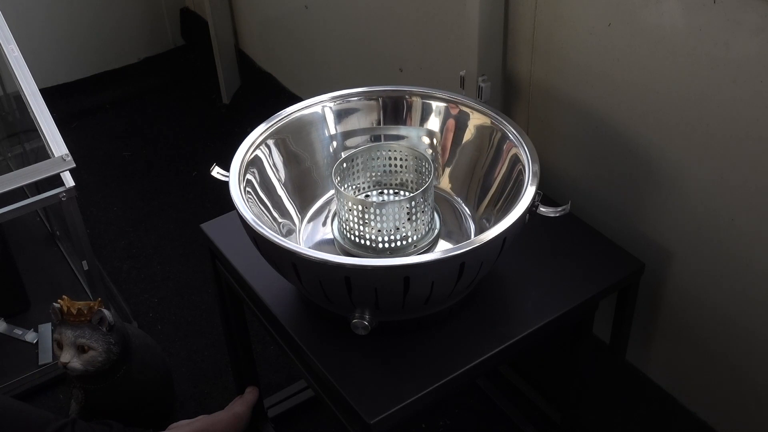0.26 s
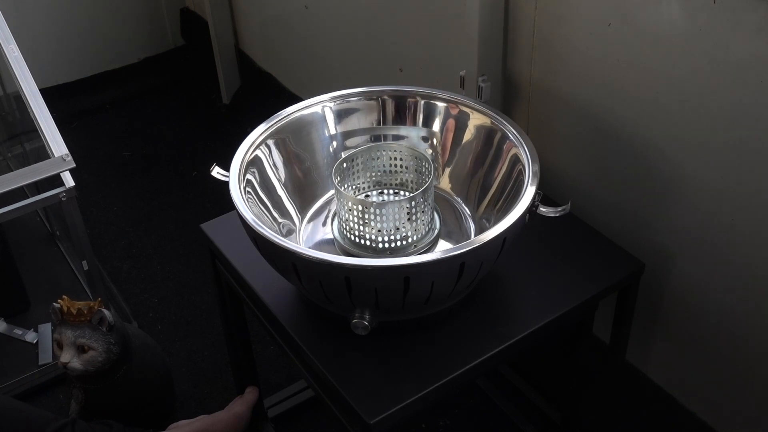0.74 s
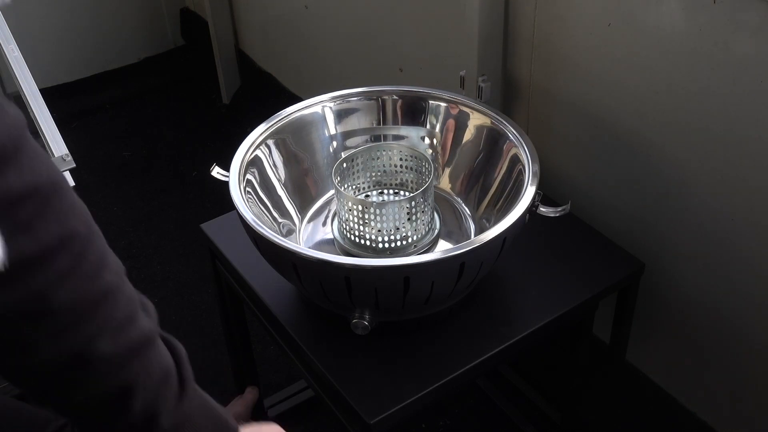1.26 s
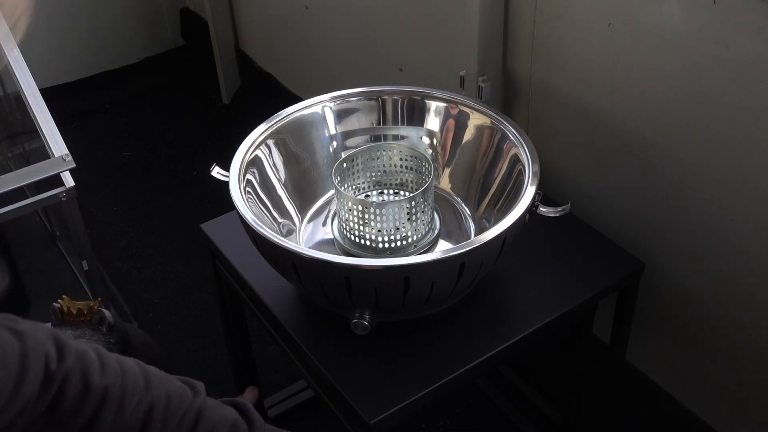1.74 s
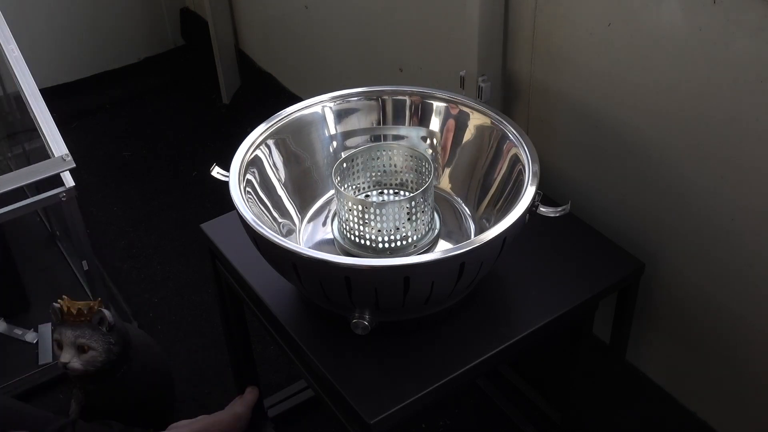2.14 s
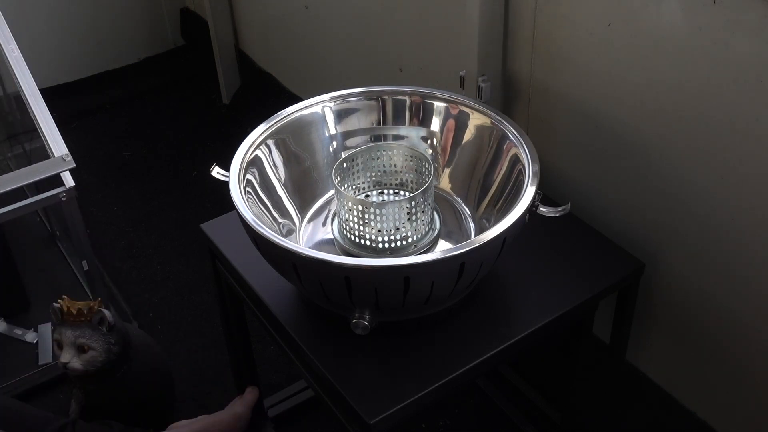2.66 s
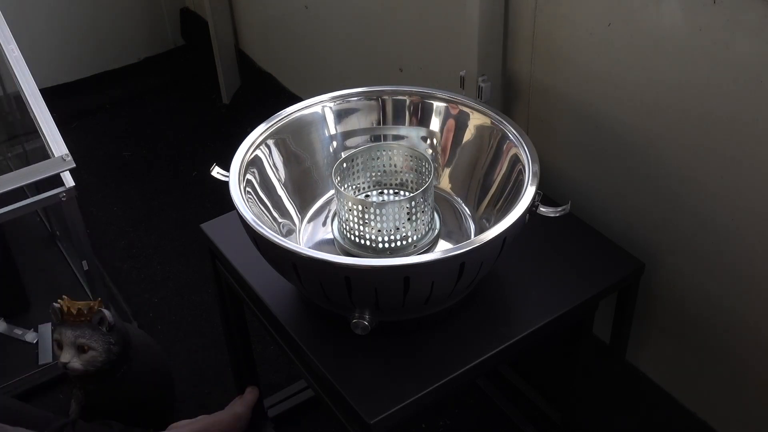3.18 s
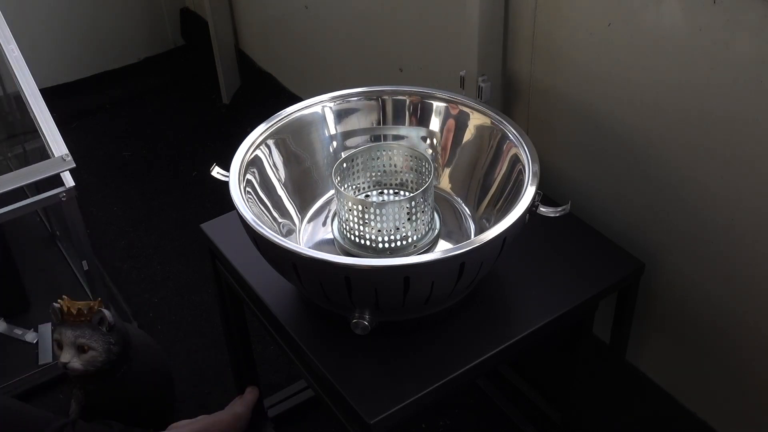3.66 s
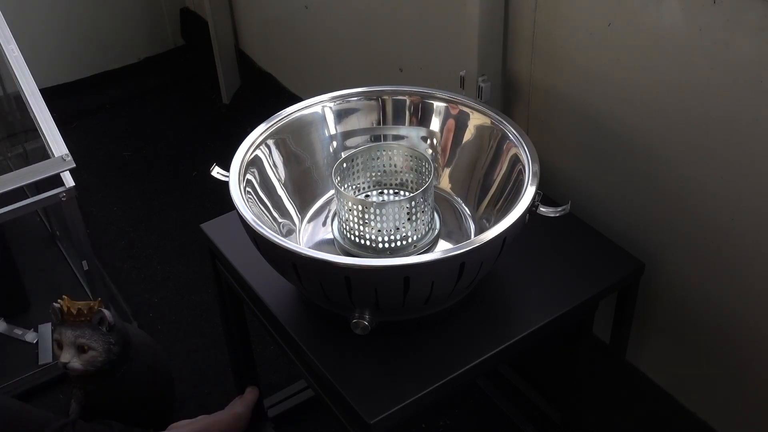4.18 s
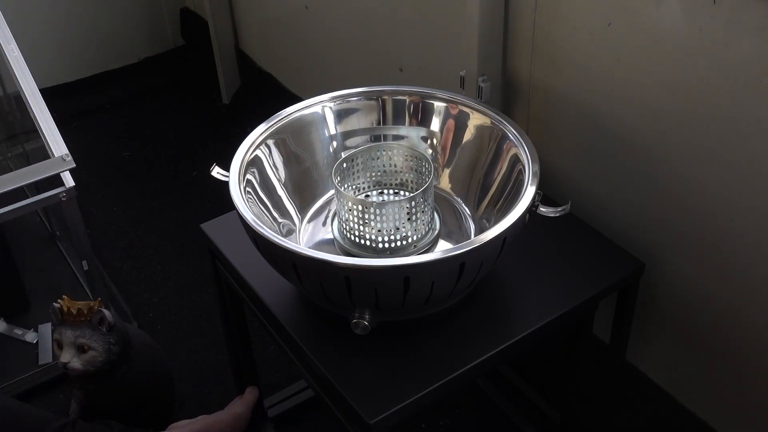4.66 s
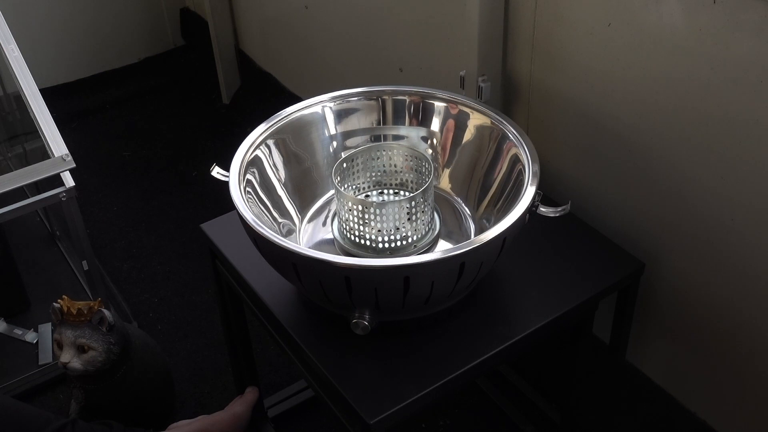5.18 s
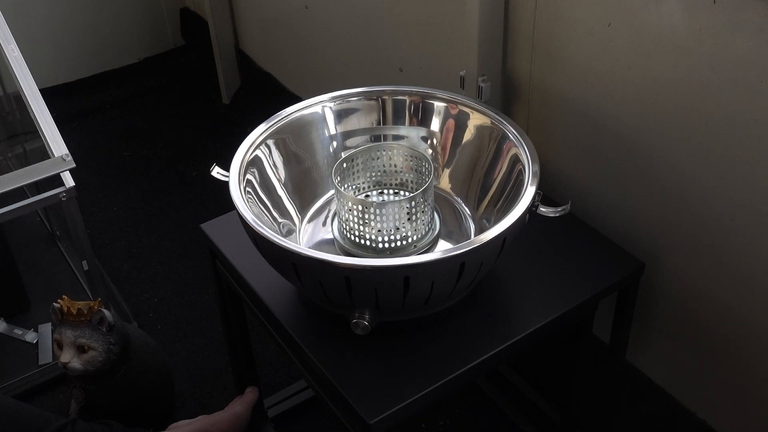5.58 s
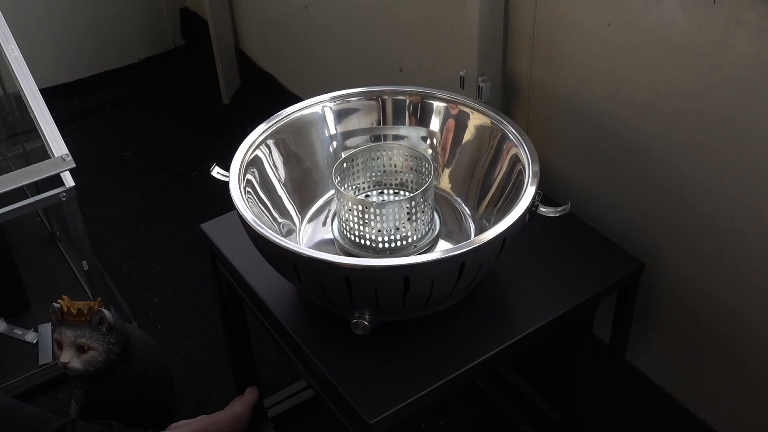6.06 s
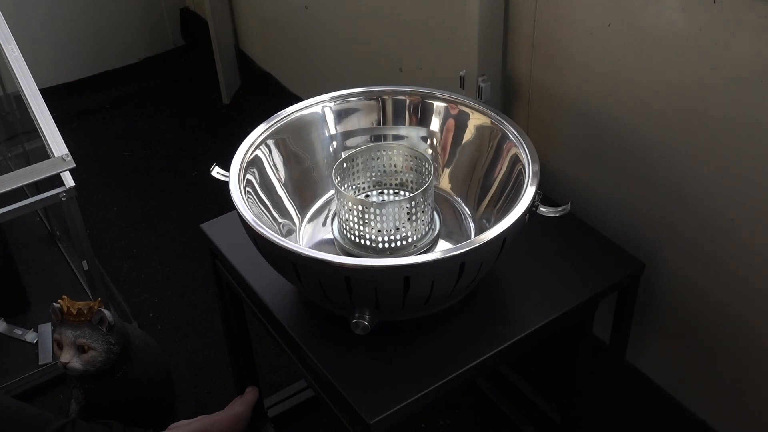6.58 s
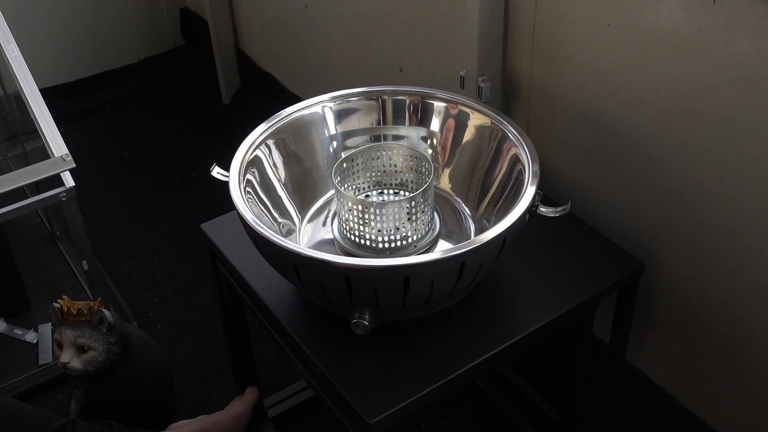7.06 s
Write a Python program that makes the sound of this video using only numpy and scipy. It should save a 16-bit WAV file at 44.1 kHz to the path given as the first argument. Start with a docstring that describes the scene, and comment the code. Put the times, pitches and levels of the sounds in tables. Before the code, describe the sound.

On a small balcony, close to the microphone, a stiff charcoal bag is barely touched at first. A short run of thin dry cracks follows, then cloth brushes and the bag starts snapping. Digging grows into loud, bright crinkling surges with grinding lumps and soft heavy thuds, ending with two crisp cracks. A low rumble and hum continue underneath, with deep puffs of air.

```python
"""A stiff bag of charcoal is rummaged through on a small balcony: many tiny noise bursts make the
crinkle and the grinding lumps, and single larger breaks make the snapping creases.
Early on comes a short run of dry cracks, with two more near the end; in between an arm digs in and
the bag crinkles in surges, over decaying low noise for thuds and soft, deep puffs of air.
Behind it go a low rumble of shaped noise and a hum of sine waves."""
import sys
import numpy as np
from scipy import signal
from scipy.io import wavfile
from scipy.ndimage import uniform_filter1d

SR = 44100
rng = np.random.default_rng(int(sys.argv[2]) if len(sys.argv) > 2 else 0)


def wav_record(signal):
    """Record a signal, one row per channel, as 16-bit PCM in the file named by sys.argv[1]."""
    frames = np.transpose(np.atleast_2d(signal))
    bounded = np.clip(frames, -1, 1)
    # unit amplitude maps onto the largest positive 16-bit level
    quanta = np.round(bounded * 32767).astype(np.int16)
    wavfile.write(sys.argv[1], SR, quanta)


N = 322812
TIME = np.arange(N) / SR   # s

# colour of the crinkling bag: pitch_hz [Hz], level_db [dB per Hz, relative]
PAPER_COLOUR = [(700, -15), (950, -19.5), (1300, -2.5), (1800, -8), (2700, -2.5), (3800, 0.5), (4800, -2.5),
                (7100, 4.5), (9700, -1), (12000, -3.5), (15500, -8)]
# colour of the lumps and of the bag's body: pitch_hz [Hz], level_db [dB per Hz, relative]
LUMP_COLOUR = [(60, 8.5), (100, 13), (150, 3.5), (200, 0.5), (250, -5), (400, -6.5), (520, 0), (650, -11),
               (760, -27), (950, -5.5), (1300, -1.5), (2200, -5.5), (4000, -12)]


def digging():
    """Each shove crumples the bag and stirs the lumps, on top of the light handling.
    Gives the crinkle's level and brightness and the lumps' level."""
    # light, unbroken handling of the bag: start_s [s], crinkle_db [dB, before the mix]
    handling = [(0.0, -40), (0.13, -59.5), (0.7, -81), (1.5, -63), (1.65, -47.5), (2.2, -52.5),
                (2.62, -47.5), (2.97, -42), (3.09, -53), (3.27, -38.5), (3.65, -38), (4.25, -48),
                (4.7, -43), (5.07, -43), (5.68, -31.5), (5.93, -51), (6.42, -45), (6.78, -52.5)]
    # shoves of the arm into the bag: full_force_s [s], crinkle_db [dB, before the mix],
    # lumps_db [dB against the crinkle, before the mix], bright_db [dB per octave],
    # attack_s [s], hold_s [s], release_s [s]
    shoves = [(2.355, -39.5, -0.5, 3.5, 0.15, .005, 0.043), (2.575, -40, 4.5, 3, .035, 0.0046, 0.0236),
              (2.678, -14, -8.5, 2.5, 0.012, 0.0043, 0.022), (2.7, -27, -7, -0.5, 0.035, 0.0115, 0.22),
              (2.817, -8.5, -8.5, 1, 0.012, 0.0078, .036), (2.851, -18, -8.5, -0.5, 0.018, 0.0078, .03),
              (3.15, -35, -4.5, -5, 0.0091, 0.00334, 0.018), (3.215, -29, -5.5, 2.5, 0.008, 0.0039, 0.023),
              (3.321, -23, -7, 0, 0.062, 0.032, 0.041), (3.435, -12.5, -12, -3, 0.027, 0.022, .1),
              (3.836, -26, -7, -0.5, 0.14, 0.057, 0.186), (4.075, -34, 1, 0, 0.022, 0.0054, 0.0671),
              (4.18, -32, -6, -2, 0.013, 0.0046, 0.039), (4.334, -27, -9.5, 1, 0.08, 0.0184, 0.081),
              (4.459, -15, -11, 1.5, 0.061, 0.004, 0.075), (4.574, -31.5, -15, -5.5, 0.035, 0.00239, 0.08),
              (4.757, -29, -9, 0.5, 0.13, 0.0471, 0.0665), (4.884, -23, -12, 2.5, 0.015, 0.017, 0.028),
              (4.924, -13, -12.5, -0.45, 0.039, 0.0078, 0.046),
              (5.273, -23.5, -16, 2.5, 0.12, 0.01896, 0.085), (5.39, -24, -13, -1.5, 0.15, 0.021, 0.031),
              (5.59, -18, -11.5, -2.5, 0.14, 0.00633, 0.0538),
              (5.738, -16, -10, -2.5, 0.00917, 0.00915, 0.054),
              (5.786, -14.5, -19, -1, 0.041, 0.0046, 0.026), (5.814, -27, -8.5, 1.5, 0.022, 0.0059, 0.084),
              (6.1, -9, -12.5, -0.9, 0.1, 0.028, .11), (6.488, -13, -20, 3.5, 0.0034, 0.011, 0.037),
              (6.508, -17, -16, -2, .021, 0.0378, 0.03), (6.573, -13.5, -14, -2, 0.028, 0.026, 0.036),
              (6.915, -13.5, -14, -2, 0.04, 0.0079, 0.14), (7.028, -30.5, -6, -2, 0.099, 0.056, 0.111)]
    handling_lumps_db = -3.5   # against the crinkle, before the mix

    paper_power = from_db(in_time(handling)[0]) ** 2
    lump_power = paper_power * from_db(handling_lumps_db) ** 2
    bright_sum = 0
    for s, level_db, lumps_db, bright_db, attack_s, hold_s, release_s in shoves:
        push = swell(s, level_db, attack_s, hold_s, release_s) * grip(s, attack_s, hold_s, release_s)
        paper_power = paper_power + push
        lump_power = lump_power + push * from_db(lumps_db) ** 2
        bright_sum = bright_sum + push * bright_db
    # the stronger a push, the more its brightness counts
    return 10 * np.log10(paper_power), bright_sum / paper_power, 10 * np.log10(lump_power)


def swell(s, level_db, attack_s, hold_s, release_s):
    """Power of one push: it builds up to its time, holds, and dies away."""
    range_db = 21   # rise during the attack and fall during the release
    before = np.maximum(s - TIME, 0) / attack_s
    after = np.maximum(TIME - s - hold_s, 0) / release_s
    return from_db(level_db - range_db * np.minimum(before + after, 10)) ** 2


def grip(s, attack_s, hold_s, release_s):
    """1 while the hand presses on the bag, falling quickly to 0 before and after."""
    take_hold_s, let_go_s = 0.004, 0.025   # how quickly the hand grips, and the bag comes to rest
    early = np.maximum(s - attack_s - TIME, 0) / take_hold_s
    late = np.maximum(TIME - s - hold_s - release_s, 0) / let_go_s
    return np.exp(-np.minimum(early + late, 20))


def crinkle(level_db, bright_db):
    """The harder the bag is pushed, the more creases buckle each second and the brighter they are."""
    push_db = np.clip(level_db + 34, -8, 22)
    per_s = 720 * from_db(.6 * push_db)
    tilt_db = bright_db + 0.18 * (push_db - 12) + 0.21 * drift(14)
    creases = grains(PAPER_COLOUR, per_s, tilt_db, spread_db=5.0, fizz_s=0.0015,
                     clump_db=4.0, colour_db=3.5)
    return from_db(level_db - 3.0) * creases


def lumps(level_db):
    """Lumps grind and knock on each other inside the bag."""
    grinding = grains(LUMP_COLOUR, 600, np.zeros(N), spread_db=2.5, fizz_s=0.0022,
                      clump_db=1.5, colour_db=3.0)
    return from_db(level_db + 1.0) * grinding


def snaps():
    """A large crease snaps through with a sharp click and a short crunch, and the facet beside it rings
    at a pitch of its own; broad folds have more lows."""
    # creases snapping through: start_s [s], peak_db [dB, before the mix],
    # lows_db [dB against the peak, before the mix]
    crease_rows = [(0.128, -36.5, -4), (0.324, -30.5, -16), (1.25, -30.5, -14), (1.7, -20, -19),
                   (1.7607, -10.5, -17.5), (1.7659, -15, -18), (1.8375, -17, -37), (1.9094, -15, -14.5),
                   (1.952, -19, -12.5), (2.0308, -17, -20), (2.264, -22.5, -27), (2.388, -19.5, -17.5),
                   (2.4601, -21, -32), (2.6723, -8, -8.5), (2.811, -4, -9.5), (2.911, -15, -16),
                   (2.961, -10, -17.5), (2.9857, -18, -11.5), (3.018, -21, -7), (3.0429, -18, -14),
                   (3.106, -17, -20), (3.1945, -12.5, -22), (3.2942, -6, -42), (3.3817, -13.5, -15),
                   (3.419, -6, -20), (3.438, -5, -32), (3.6012, -14.5, -31), (3.736, -11, -35),
                   (3.783, -13, -35), (3.8146, -10, -26), (3.846, -6.5, -33.5), (3.9629, -13.5, -28),
                   (3.998, -13.5, -22), (4.0661, -9.5, -18), (4.124, -20.5, -9), (4.1607, -20.5, -15),
                   (4.2023, -13, -12), (4.2666, -15, -20.5), (4.4385, 1.5, -32), (4.4557, 7, -20.5),
                   (4.557, -17, -13), (4.616, -18, -11), (4.9108, -1.5, -20), (4.958, -2.5, -18.5),
                   (4.9929, -13.5, -10), (5.1594, -6.5, -43), (5.184, -11, -13), (5.2156, -10.5, -18),
                   (5.346, -9, -31.5), (5.4787, -9.5, -14), (5.5934, -4, -23), (5.7406, -4.5, -11.5),
                   (5.92, -19.5, -16), (5.9913, -7.5, -34), (6.0431, 2, -14), (6.2079, -7, -15.5),
                   (6.23, -8, -20), (6.3533, -10, -39.5), (6.3702, -9, -18), (6.4117, -11, -19.5),
                   (6.4639, -13.5, -19), (6.4861, 7.5, -31), (6.54, -5, -34.5), (6.6585, -16, -10),
                   (6.6928, -12, -42.5), (6.7192, -15.5, -37), (6.819, -17, -18.5), (6.8845, -9, -9),
                   (6.911, 3, -25), (7.108, -21, -6.5), (7.1421, -14, -32.5)]
    # range in which the facets between creases ring: lowest_hz [Hz], highest_hz [Hz]
    facet_range = (3766, 11970)

    highs, lows, click, facets = np.zeros((4, N))
    facet_pitches = np.exp(rng.uniform(*np.log(facet_range), len(crease_rows)))
    for (s, peak_db, lows_db), hz in zip(crease_rows, facet_pitches):
        span, size = splinters(s, t60=0.053, per_s=2000, after_db=-5.5, first_t60=0.0067)
        highs[span] += from_db(peak_db) * size
        lows[span] += from_db(peak_db + lows_db) * size
        click[span.start] = from_db(peak_db + 8.5)
        rough_push = size * rng.standard_normal(len(size))
        facets[span] += from_db(peak_db) * ring(rough_push, hz, t60=0.0047)

    def crunch(hz):
        # each band wavers by itself, so the snaps differ in colour
        return from_db(3.2 * drift(10.8)) * (click + highs * rng.standard_normal(N))

    paper = coloured(PAPER_COLOUR, crunch)
    body = coloured(LUMP_COLOUR, lambda hz: lows * rng.standard_normal(N))
    return from_db(-11.0) * paper + from_db(-20.5) * facets + from_db(1.0) * body


def knocks():
    """Large lumps tumble against each other; the hollow of the bag rings with them."""
    # tumbling lumps: start_s [s], level_db [dB, before filtering], pitch_hz [Hz],
    # settle_s [s to fall by 60 dB]
    tumbles = [(2.814, -21.5, 210, 0.16), (4.912, -26.5, 169, 0.15), (5.2, -36.5, 177.3, 0.67),
               (5.738, -28, 480.2, 0.076)]
    out = np.zeros(N)
    for s, level_db, hz, t60 in tumbles:
        age = np.maximum(TIME - s, 0)
        force = from_db(level_db - 60 * np.minimum(age / t60, 2)) * (age > 0)
        hollow = ring(force * rng.standard_normal(N), hz, t60=0.071)
        out += band(hollow, hz / 1.44, hz * 1.31)
    return out


def thuds():
    """The charcoal drops and settles as one mass; its weight booms briefly through bag and floor."""
    # the bag's weight shifting: start_s [s], level_db [dB], t60_s [s to fall by 60 dB]
    drops = [(1.907, -22.5, 0.63), (2.669, -13.5, 0.262), (2.814, -19, 0.126), (2.853, -10.5, 0.16),
             (3.274, -24, 0.133), (3.426, -17.5, 0.52), (4.452, -13, 0.276), (4.915, -15.5, 0.23),
             (5.586, -21, 0.179), (5.738, -12, 0.17), (6.044, -15.5, 0.17), (6.102, -15.5, 0.28),
             (6.577, -14, 0.28), (6.909, -20.5, 0.33)]
    # colour of the boom: pitch_hz [Hz], level_db [dB per Hz, relative]
    bulk_colour = [(35, -0.5), (50, 11.5), (70, -7), (100, 1.5), (120, -20.5), (145, -14.5), (170, -16),
                   (205, -38), (250, -28)]
    force = np.zeros(N)
    for s, level_db, t60 in drops:
        age = np.maximum(TIME - s, 0)
        soft_start = 1 - np.exp(-age / 0.00207)
        force += from_db(level_db - 60 * age / t60) * soft_start
    return force * evened(coloured(bulk_colour, lambda hz: rng.standard_normal(N)))


def cracks():
    """Something thin and brittle gives way in short, bright bursts, each ringing at a pitch of its own."""
    # dry cracks: start_s [s], peak_db [dB, before the mix],
    # splinter_s [s for the splintering to fall by 60 dB], ring_hz [Hz]
    crack_rows = [(0.7933, -18, 0.11, 9860), (0.8236, -18, 0.076, 5820), (0.8587, -21, 0.083, 5780),
                  (0.906, -20.5, 0.052, 6600), (0.9425, -21.5, 0.073, 6280), (0.9819, -18.5, 0.033, 7000),
                  (1.0391, -19.5, 0.042, 7400), (7.286, -10, 0.057, 10360), (7.3061, -7.5, 0.042, 1850)]
    # colour of the bursts: pitch_hz [Hz], level_db [dB per Hz, relative]
    crack_colour = [(1000, -11.5), (1660, -5.5), (2600, -2), (4410, 1.5), (4860, -4), (8350, 0.5),
                    (14900, -9.5), (16000, -15)]
    force, rings = np.zeros((2, N))
    for s, peak_db, t60, hz in crack_rows:
        span, size = splinters(s, t60, per_s=2500, after_db=1.0, first_t60=0.0084)
        force[span] += from_db(peak_db) * size
        rough_push = size * rng.standard_normal(len(size))
        rings[span] += from_db(peak_db) * ring(rough_push, hz, t60=0.012)

    def burst_noise(hz):
        return force * from_db(1.07 * drift(31.7)) * rng.standard_normal(N)

    burst = coloured(crack_colour, burst_noise)
    return band(from_db(-5.0) * burst + from_db(-12.5) * rings, 1984, 15000)


def sleeve():
    """Cloth slides with a fine, scratchy grain as the arm reaches across."""
    # the arm reaching over, silent outside these times: start_s [s], swish_db [dB, before the mix]
    reach = [(1.0, -40), (1.08, -44.5), (1.25, -49.5), (1.5, -58.5), (1.6, -40), (1.73, -38.5),
             (1.85, -54.5), (2.049, -39.5), (2.2, -45.5)]
    # colour of the cloth: pitch_hz [Hz], level_db [dB per Hz, relative]
    cloth_colour = [(900, -10.5), (1300, -3), (2300, -6), (5500, -1.5), (8000, -6), (15000, -14)]
    s, level_db = np.transpose(reach)
    gain = from_db(np.interp(TIME, s, level_db, left=-np.inf, right=-np.inf) - 7.5)
    return gain * grains(cloth_colour, 1500, np.zeros(N), spread_db=3.0, fizz_s=0.003,
                         clump_db=5.0, colour_db=4.0)


def puffs():
    """Handling sends soft, very deep pushes of air to the microphone."""
    # air pushed against the microphone: full_force_s [s], level_db [dB]
    air_pushes = [(0.37, -17), (1.48, -25.5), (1.95, -16.5), (2.15, -18.5), (2.86, -13), (3.53, -25.5),
                  (4.53, -22.5), (4.999, -18.5), (5.75, -20), (6.1, -16)]
    attack_s, hold_s, release_s = 0.14, 0.004, 0.23
    draught_db = -33   # air that keeps moving between the puffs
    deep_noise = band(band(rng.standard_normal(N), 10.3, 37.4), 10.3, 37.4)
    power = sum(swell(s, level_db, attack_s, hold_s, release_s) for s, level_db in air_pushes)
    return np.sqrt(power + from_db(draught_db) ** 2) * evened(deep_noise)


def balcony(x, wet_db):
    """Close walls return a short wash of echoes, whose pattern shifts as the bag moves."""
    t60_s = 0.12
    age = np.arange(int(.3 * SR)) / SR
    turn, out = np.pi * drift(1.86), x
    # two echo patterns, with a slowly drifting share of the sound in each
    for share in (np.cos(turn), np.sin(turn)):
        echoes = rng.standard_normal(len(age)) * from_db(-60 * age / t60_s) * (age > .003)
        echoes = signal.lfilter(*signal.butter(1, 9000, fs=SR), echoes / np.linalg.norm(echoes))
        out = out + from_db(wet_db) * signal.fftconvolve(share * x, echoes)[:N]
    return out


def background():
    """Far rumble with a faint hiss, and a wavering hum."""
    # colour of rumble and hiss: pitch_hz [Hz], level_db [dB per Hz, relative]
    air_colour = [(25, 7), (50, -2.5), (75, -12), (110, -22), (160, -30.5), (250, -38), (500, -42),
                  (750, -55.5), (1100, -46), (2500, -50), (6000, -48), (16000, -51)]
    # hum tones: pitch_hz [Hz], level_db [dB rms]
    hum_tones = [(48.5, -40), (100.5, -50)]
    air = rms_one(coloured(air_colour, lambda hz: rng.standard_normal(N)))
    hum = np.zeros(N)
    for hz, db in hum_tones:
        phase = 2 * np.pi * hz * TIME + 0.23 * drift(2.8)
        hum += from_db(db) * np.sqrt(2) * np.sin(phase)
    return from_db(-28.5) * air + hum


def grains(spectrum, per_s, tilt_db, spread_db, fizz_s, clump_db, colour_db):
    """Many small and a few large breaks, each a brief fizz of its own colour, at a level near 1;
    tilt is per octave."""
    at = np.flatnonzero(rng.random(N) < per_s / SR)   # samples where something breaks
    sizes_db = spread_db * np.minimum(rng.exponential(1, len(at)), 3) + clump_db * drift(15.7)[at]
    sizes = from_db(sizes_db)
    # divide by the local level, so that more breaks do not make it louder
    power = uniform_filter1d(np.bincount(at, sizes ** 2, minlength=N), int(.035 * SR))
    sizes = sizes / np.sqrt(power[at] + 1e-9)
    fade = np.exp(-1 / (fizz_s * SR))

    def excite(hz):
        octaves = np.clip(np.log2(hz / 6000), -1, 2)
        colour = colour_db * rng.standard_normal(len(at)) + tilt_db[at] * octaves
        energy = np.bincount(at, (sizes * from_db(colour)) ** 2, minlength=N)
        fizz_power = signal.lfilter([1 - fade], [1, -fade], energy + 1e-18)
        return np.sqrt(fizz_power) * rng.standard_normal(N)
    return coloured(spectrum, excite)


def splinters(s, t60, per_s, after_db, first_t60):
    """One break: a first short tick, then a dying run of smaller ones. Gives samples and sizes."""
    age = np.arange(int(.1 * SR)) / SR
    follows = (rng.random(len(age)) < per_s / SR) * np.sqrt(SR / per_s)
    size = from_db(-60 * age / first_t60) + from_db(after_db - 60 * age / t60) * follows
    start = round(s * SR)
    return slice(start, min(start + len(age), N)), size[:N - start]


def ring(force, hz, t60):
    """One resonance, dying by 60 dB in t60 seconds; white noise keeps its power."""
    r = from_db(-60 / (t60 * SR))
    feed = np.sqrt((1 - r * r) / 2) * np.array([1, 0, -1])
    return signal.lfilter(feed, [1, -2 * r * np.cos(2 * np.pi * hz / SR), r * r], force)


def coloured(spectrum, excite):
    """Third-octave resonances, each driven by excite(Hz); white noise keeps its power."""
    edges_hz = np.geomspace(20, 17000, 30)
    hz_points, db_points = np.transpose(spectrum)
    out, power = np.zeros(N), 0
    for low, high in zip(edges_hz, edges_hz[1:]):
        hz = np.sqrt(low * high)
        if hz_points[0] / 2 < hz < hz_points[-1] * 2:
            gain = from_db(np.interp(np.log(hz), np.log(hz_points), db_points))
            out += gain * band(excite(hz), low, high)
            power += gain ** 2 * (high - low) / (SR / 2)
    return out / np.sqrt(power)


def band(x, low_hz, high_hz):
    """Band-pass between two edges."""
    return signal.sosfilt(signal.butter(2, [low_hz, high_hz], "band", fs=SR, output="sos"), x + 1e-18)


def drift(rate):
    """Slow chance wandering of spread 1; a higher rate (Hz) wanders faster."""
    # made at one value per 40 samples; the first 2000 let the filter settle
    r = np.exp(-80 * np.pi * rate / SR)
    slow = signal.lfilter([1], [1, -2 * r, r * r], rng.standard_normal(N // 40 + 2002))[2000:]
    return np.interp(np.arange(N) / 40, np.arange(len(slow)), rms_one(slow))


def evened(x):
    """Noise with its slow swells taken out; rms 1."""
    size = int(.06 * SR)
    slow_power = uniform_filter1d(uniform_filter1d(x ** 2, size), size)
    return rms_one(x / np.sqrt(slow_power + 1e-12))


def in_time(rows):
    """Columns of a curve at every sample."""
    s, *columns = np.transpose(rows)
    return [np.interp(TIME, s, c) for c in columns]


def rms_one(x):
    """Scale to an rms of 1."""
    return x / np.sqrt(np.mean(x ** 2) + 1e-20)


def from_db(db):
    """Decibels to gain."""
    return 10 ** (np.asarray(db) / 20)


def scene():
    """Bag and arm between the balcony's walls, over the steady background."""
    crinkle_db, bright_db, lumps_db = digging()
    bag = crinkle(crinkle_db, bright_db) + lumps(lumps_db) + snaps() + knocks()
    near = bag + cracks() + sleeve()
    return (balcony(near, wet_db=-10.5) + thuds() + puffs() + background())[None]


def record(dry):
    """The loudest peaks overload and are clipped flat; the treble above 15.9 kHz is cut."""
    treble_cut = signal.ellip(10, .1, 70, 15900, fs=SR, output="sos")
    return signal.sosfilt(treble_cut, np.clip(dry, -1, 1))


dry = scene()
out = record(dry)
wav_record(out)
```